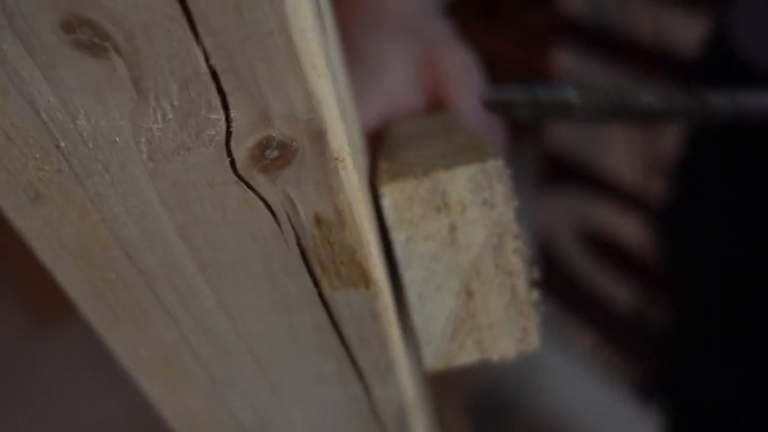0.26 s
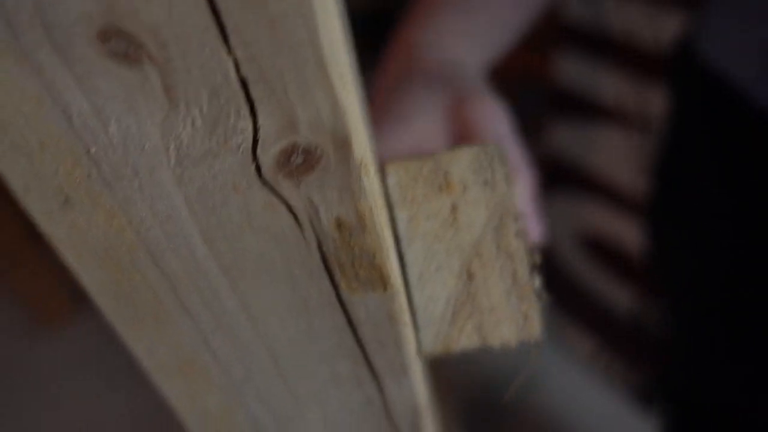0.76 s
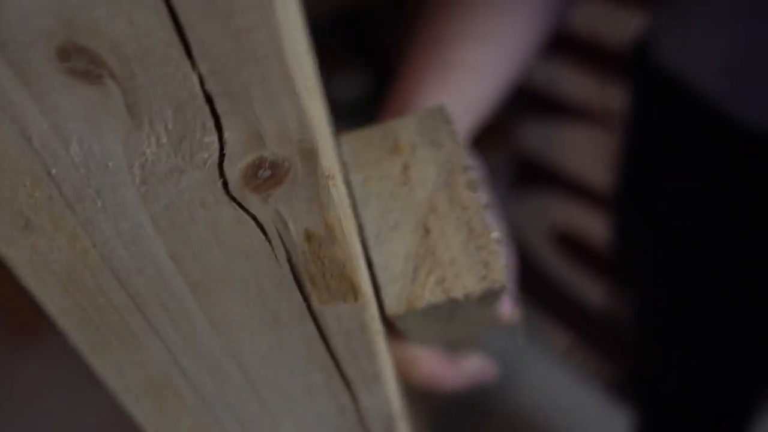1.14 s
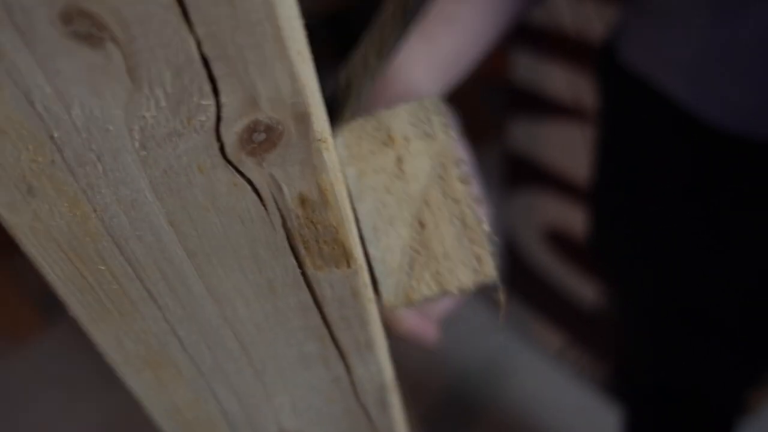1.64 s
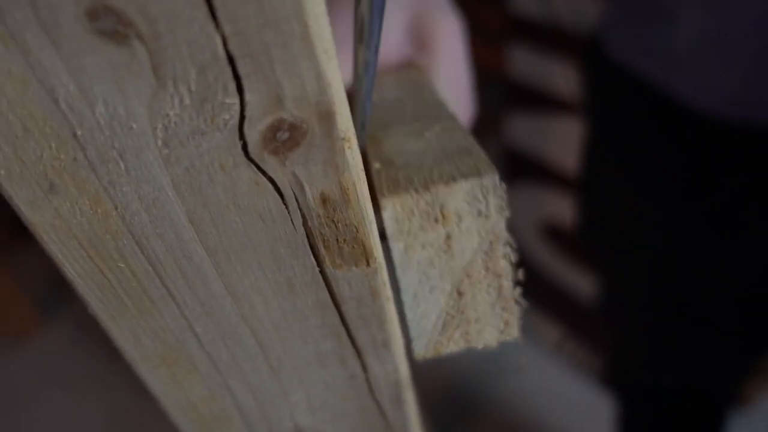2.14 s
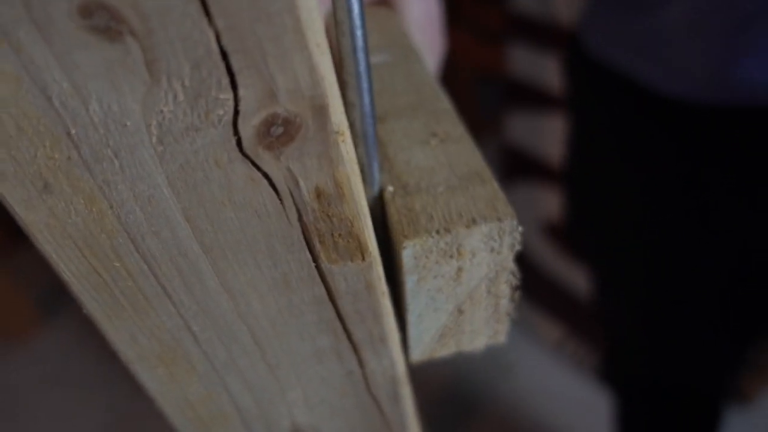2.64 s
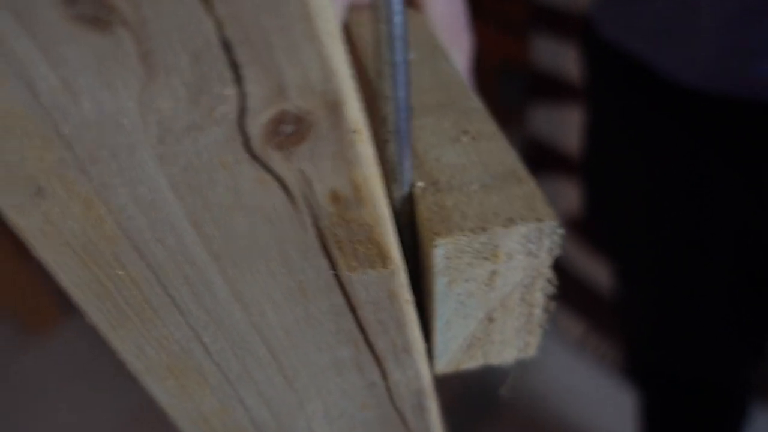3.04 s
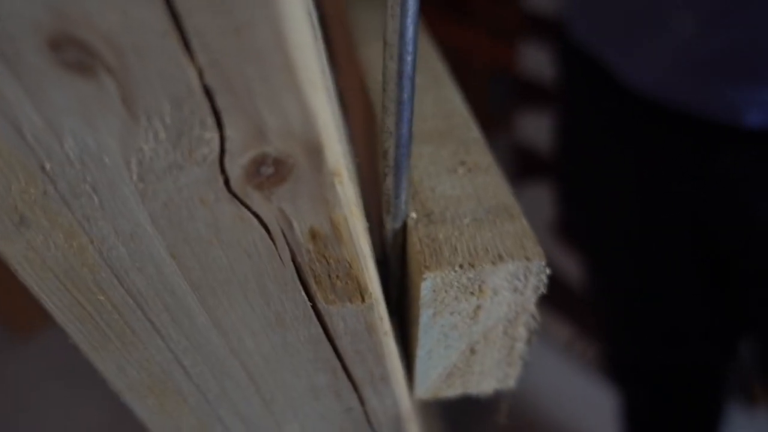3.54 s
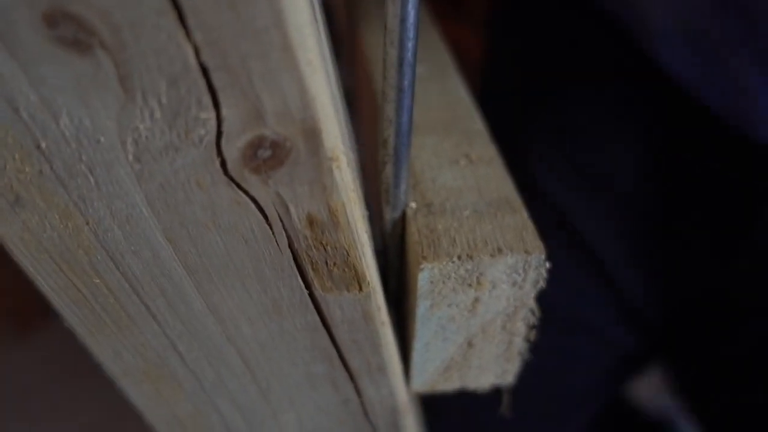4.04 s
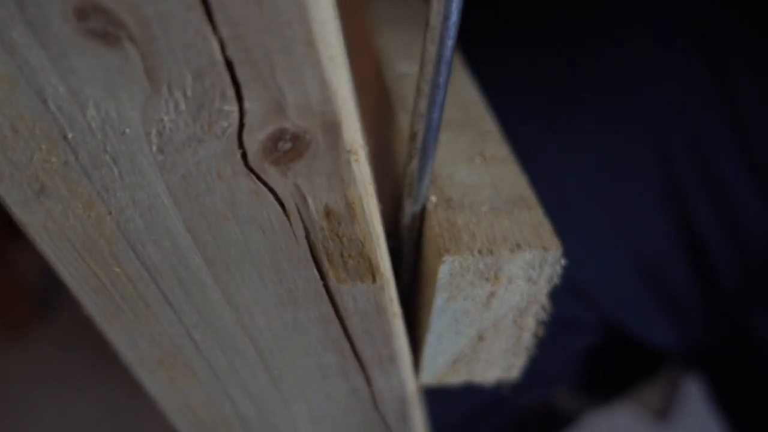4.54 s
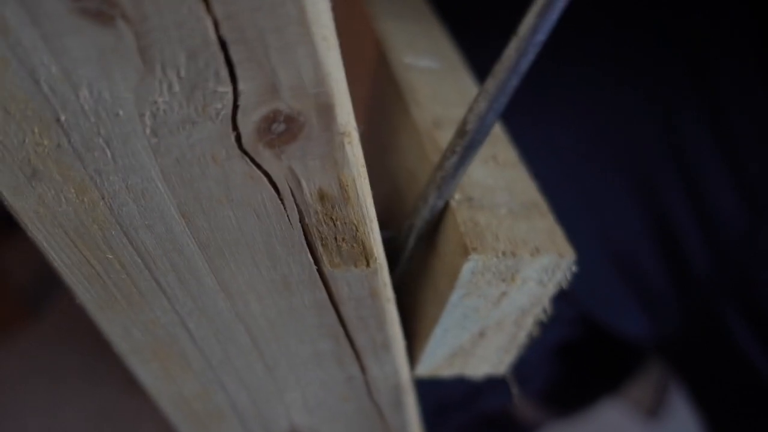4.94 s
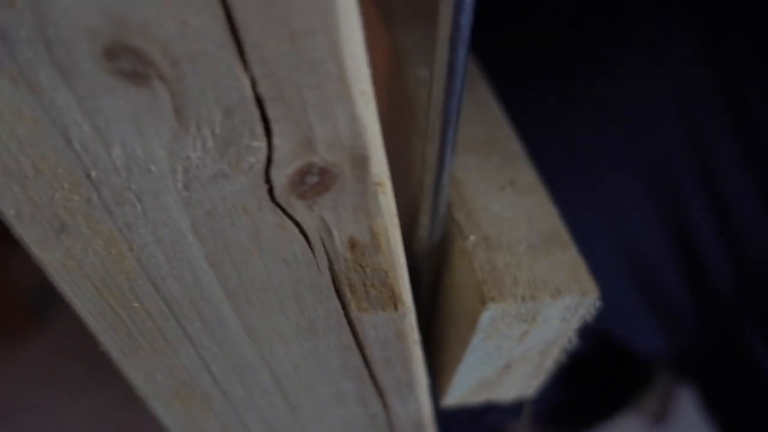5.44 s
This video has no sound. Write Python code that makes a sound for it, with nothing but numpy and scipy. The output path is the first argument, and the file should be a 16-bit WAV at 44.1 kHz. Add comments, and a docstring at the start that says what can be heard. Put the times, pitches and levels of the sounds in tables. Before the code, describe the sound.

After a loud, ringing knock on wood, a steel bar taps and rasps irregularly between nailed boards in a small workshop, growing sharper near the end.

```python
"""One hard knock on a board rings through a small workshop. Then a thin steel bar is slid, tapped and
levered between a nailed block and the board. Each impact excites the normal modes of steel and wood:
a click, a ring and a knock. Between impacts, the friction of steel and hands on wood rasps and makes
the bar sing, and a nail creaks by stick-slip. The walls reverberate over a faint hush, and a limiter
holds down the first blow."""
import sys
import numpy as np
from scipy import signal
from scipy.fft import rfft, irfft, next_fast_len
from scipy.io import wavfile
from scipy.ndimage import uniform_filter1d, minimum_filter1d, map_coordinates

SR = 44100
rng = np.random.default_rng(int(sys.argv[2]) if len(sys.argv) > 2 else 0)


def unload_audio(sound):
    """Save the sound as a 16-bit wav file, at the path given as the first command line argument."""
    columns = np.transpose(np.atleast_2d(sound))
    # keep every value between -1 and 1, then stretch to whole-number steps
    steps = np.round(np.clip(columns, -1, 1) * 32767)
    wavfile.write(sys.argv[1], SR, steps.astype(np.int16))


N = 251149

# Long-lived modes of the hard-struck board: (frequency [Hz], relative level [dB], T60 [s])
BLOW_MODES = [(688.6, -5.5, .38), (715, -2, .4), (890, -12, .3), (1141, -11, .3), (1497, -7, .28),
              (1932, -15, .33), (2017, -12.5, .35)]
# Spectrum of the blow's reverberation: (frequency [Hz], relative level [dB])
BLOW_SPECTRUM = [(90, -37.5), (704, -14.5), (1490, -11.5), (7410, -34.5), (10800, -38)]
# Impacts of steel on wood: (time [s], ring level [dB], thud [dB re ring], knock [dB re ring],
# favoured mode [Hz], its level [dB re ring], force rise time [s])
CONTACTS = [(0.456, -39, 2.5, 2, 1493, 0, 0.0047), (0.859, -29, -15, -4, 761, 3, 0.0042),
            (0.9422, -33.5, -9.5, -12, 785, 2.5, 0.0024), (1.1921, -47.5, -25, -4.5, 780, 1, 0.0027),
            (1.4722, -30.5, -14, -1.5, 906, -10, 0.0043), (1.501, -30.5, -23, -12, 894, 5, 0.0028),
            (1.507, -24.5, -12, -8.5, 3220, -10, 0.0042), (1.811, -29.5, -20, -12.5, 805, -4.5, 0.0012),
            (1.959, -42.5, -15, -24, 760, -3, 0.0019), (2.039, -53, 5, 5, 770, 15.5, 0.0038),
            (2.2636, -44.5, -8, -8, 1940, 3, 0.0021), (2.967, -42, -39, 0, 1180, -18, 0.00054),
            (3.1287, -50, -34, 6, 780, 7, 0.0025), (3.294, -42, 2.5, 6.5, 1562, 6, 0.004),
            (3.6, -46.5, 7, 3, 1200, 5, 0.0035), (3.655, -49, -1, 6.5, 2050, 10, 0.0023),
            (4.303, -35.5, -36, -24, 2890, -7, 0.018), (4.5097, -50.5, 5.5, 11.5, 552, 10, 0.0015),
            (4.544, -18.5, -31.5, -13, 2340, -33, 0.0052), (4.653, -32, -32, -5.5, 3240, 1, 0.0023),
            (4.6845, -14.5, -68, -59, 3160, 2, 0.0017), (4.71, -25.5, -46, -9.5, 3230, 3.5, 0.0024),
            (4.7527, -15.5, -54, -52, 3234, 5.5, 0.0018), (4.9999, -35, -52, -17, 2660, -20, 0.002),
            (5.0441, -57.5, 8.5, 15, 1004, 11.5, 0.0022), (5.0746, -24, -27.5, -42, 3204, 2, 0.0017),
            (5.227, -10.5, -45, -16, 2615, -22.5, 0.0026), (5.408, -32.5, -16, -19, 866, 2.5, 0.012),
            (5.422, -17, -18, -12.5, 2645, -24, 0.011), (5.6178, -20, -13.5, -5.5, 2592, -17, 0.0032),
            (5.665, -32, -11, -16, 2670, -19, 0.0028), (5.682, -31.5, -7, -20, 2600, -17, 0.0026)]
# The bar's high modes over time, how bright each tap's click sounds: (time [s], level [dB re ring])
CLICK_LEVELS = [(.8, -36.5), (1.85, -8), (2.6, 16), (3.3, -6), (3.66, 7), (4.3, 8.5), (4.55, -26),
                (4.66, 6.5), (5.1, 2.5), (5.4, -19), (5.68, 3)]
# Steel modes; the wood's grip damps some and frees others:
# (frequency [Hz], base bandwidth [Hz], gain when free [dB], gain when wedged [dB])
BAR_MODES = [(1530, 70, -4, -14), (2000, 100, -14, -6), (2620, 110, -13, -1), (3275, 75, 0, -11),
             (4470, 300, -17, -5), (5270, 200, -9.5, -18), (5750, 300, -24, -11), (7200, 170, -12, -15),
             (8700, 110, -16, -17)]
# Modes of the board: (frequency [Hz], bandwidth [Hz], gain [dB])
BOARD_MODES = [(582.6, 58, 2), (760.5, 99, 4.5), (883, 120, 2), (1112.7, 67.6, 9.5)]
# Low modes of the stack of block and board: (frequency [Hz], bandwidth [Hz], gain [dB])
STACK_MODES = [(238, 22, 9), (440, 90, 0)]
# Damping of the favoured mode, from hollow wood to thin steel: (frequency [Hz], bandwidth [Hz])
FAVOURED_WIDTHS = [(900, 44), (1500, 16), (2000, 50), (2450, 7), (2800, 6), (3000, 210)]
# Slow sliding of steel and palms: (time [s], rasp level [dB], rumble level [dB])
SLIDING = [(0, -53, -45.5), (.4, -68, -58.5), (.83, -64.5, -75), (1.1, -58.5, -66.5), (1.45, -65.5, -86),
           (1.6, -64, -71), (2.45, -52, -64.5), (2.73, -56.5, -58.5), (3.06, -52, -63), (3.58, -61, -70.5),
           (3.7, -53, -63), (4.15, -49, -58.5), (4.6, -43.5, -56.5), (4.97, -55.5, -64.5), (5.69, -52, -66)]
# Strokes of the bar on wood: (start [s], length [s], rasp level [dB], singing level [dB], wedged [0-1])
STROKES = [(0, 0.15, -75, -47, 0.6), (0.435, 0.068, -57, -54.5, 0.6), (0.963, 0.07, -59.5, -52.5, 0.2),
           (1.635, 0.12, -70.5, -48.5, 0), (2.09, 0.065, -66, -44.5, 0), (2.206, 0.079, -70, -51, 0),
           (2.362, 0.035, -47.5, -51, 0.3), (2.499, 0.21, -60.5, -51.5, 0.95), (2.739, 0.25, -46, -48, 1),
           (3.317, 0.1, -54, -80, 0.2), (3.79, 0.082, -62, -59, 1), (5.234, 0.046, -37.5, -42, 0.2),
           (5.626, 0.049, -40.5, -69, 0.5)]
# Spectrum of the friction noise: (frequency [Hz], relative level [dB])
RASP_SPECTRUM = [(410, -35), (700, -22.5), (2480, -15), (10500, -23)]
# Creak of the nail: (time [s], pitch [Hz], level [dB])
CREAK = [(4.56, 1198, -43), (4.65, 1290, -38.5), (4.69, 1393, -40.5), (4.78, 1515, -47.5), (4.9, 1500, -60)]
# Reverberation of the workshop: (frequency [Hz], base T60 [s])
ROOM_DECAY = [(100, 0.81), (400, 0.49), (3000, 0.32)]
# Coherence of the diffuse field: (frequency [Hz], left-right correlation [0-1])
COHERENCE = [(300, 0.99), (1200, 0.69), (10000, 0.062)]
# Spectrum of still air and hiss: (frequency [Hz], relative level [dB])
HUSH_SPECTRUM = [(59, -62), (120, -39), (310, -11), (2650, -5.5), (9620, -24.5)]


def blow(start_s=0.074, level_db=-1.5, attack_s=0.00089):
    """Free vibration: the struck board's modes decay, two close ones beating, as the room reverberates."""
    out, t = np.zeros((2, N)), np.arange(SR // 2) / SR
    ring = sum(amp(db - 60 * t / t60 + 1.2 * wobble(30)[:len(t)]) * np.sin(2 * np.pi * hz * t)
               for hz, db, t60 in BLOW_MODES)
    ring *= 1 - np.exp(-t / attack_s)
    reverb = unit(coloured(room_response(decay_scale=0.81), BLOW_SPECTRUM))
    add(out, start_s, amp(level_db) * (ring + amp(-15.5) * reverb))
    return out


def contacts():
    """Impact excitation: a brief force drives stack, board and bar; the spot struck favours one mode."""
    out, t = np.zeros((2, N)), np.arange(SR // 8) / SR
    padded = lambda x: np.pad(x, (0, SR // 4))
    for s, db, thud_db, knock_db, spot_hz, spot_db, rise_s in CONTACTS:
        force = rng.standard_normal(len(t)) * (t / rise_s * np.exp(1 - t / rise_s)) ** 2
        force /= np.linalg.norm(force)
        snap = 0.46 * force
        snap[round(rise_s * SR / 2)] += 0.0017 / rise_s  # shorter contacts strike the modes more cleanly
        impulse = snap == snap.max()  # the heavy stack feels one plain push
        wedged = np.exp(-(np.log(spot_hz / 2600) / .13) ** 2)  # a wedged bar answers near 2.6 kHz
        steel = bar_modes(wedged, damping=2.1)
        click_db = np.interp(s, *np.transpose(CLICK_LEVELS))
        thud = amp(db + thud_db) * padded(struck_body(STACK_MODES, impulse, force, crack=.02))
        knock = amp(db + knock_db) * padded(struck_body(BOARD_MODES, snap, force, crack=.08))
        ring = amp(db) * padded(struck_body(steel[:4], snap, force, crack=.1))
        click = amp(db + click_db) * padded(struck_body(steel[4:], snap, force, crack=.16))
        favoured = filtered(padded(snap), modes([(spot_hz, along(FAVOURED_WIDTHS, spot_hz), 0)]))
        favoured *= amp(db + spot_db) / np.abs(favoured).max()
        radiate(out, s, thud + knock, ring + click, favoured)
    return out


def struck_body(body, drive, force, crack):
    """Modal response, peak 1: the drive rings the modes and the force adds a broadband crack."""
    hz = np.transpose(body)[0]
    band = modes([(np.sqrt(hz[0] * hz[-1]), np.ptp(hz) * 2.94, 0)])
    sound = filtered(drive, modes(body, extra_db=rng.normal(0, 3.0, len(body))))
    sound += crack * filtered(force, lambda f: band(f) ** 2)
    sound = filtered(sound, lambda f: high_pass(f, .6 * hz[0]))  # little radiates below the lowest mode
    return sound / np.abs(sound).max()


def bar_modes(wedged, damping):
    """Boundary conditions: the grip, free (0) to wedged (1), weights the modes; damping widens them."""
    return [(hz, width * damping, free_db + wedged * (wedged_db - free_db))
            for hz, width, free_db, wedged_db in BAR_MODES]


def rubbing():
    """Sliding friction: grit under steel and palms rasps and drives the wood's modes into a rumble."""
    rasp_db, rumble_db = curves(SLIDING)
    strokes = sum(amp(db) * stroke(s, length) for s, length, db, *_ in STROKES)
    rasp = unit(diffuse(coloured(patchy(grit(rough_db=1.8), depth_db=2.8), RASP_SPECTRUM)))
    wood_modes = STACK_MODES + BOARD_MODES
    wood = modes(wood_modes, extra_db=-1.5 * np.arange(len(wood_modes)))
    rumble = filtered(grit(rough_db=0.94), lambda hz: wood(hz) * hz ** 4 / (hz ** 4 + 294.0 ** 4))
    rumble = unit(diffuse(rumble))
    return (amp(rasp_db) + strokes) * rasp + (amp(rumble_db) + amp(-15) * strokes) * rumble


def singing(smoothing_s=0.043, catch_db=2.2):
    """Forced vibration: friction sustains the bar's modes, which swell and drop as the steel catches."""
    def tone(wedged):
        friction = patchy(grit(rough_db=2.5), depth_db=1 + 2 * wedged)
        steel = modes(bar_modes(wedged, damping=.45 + .5 * wedged))
        return unit(diffuse(filtered(friction, steel)))

    free, held, out = tone(0), tone(1), 0
    for s, length, _, db, wedged in STROKES:
        swell = uniform_filter1d(stroke(s, length), size=round(smoothing_s * SR))
        blend = np.sqrt(1 - wedged) * free + np.sqrt(wedged) * held
        out = out + amp(db + catch_db * wobble(40)) * swell * blend
    return out


def stroke(s, length, grip_s=0.0073, release_s=0.02):
    """Friction envelope: a quick linear rise, a hold and an exponential decay."""
    t = np.arange(N) / SR - s
    return np.clip(t / grip_s, 0, 1) * np.exp(-np.maximum(t - length, 0) / release_s)


def grit(rough_db):
    """Surface roughness: fast amplitude modulation breaks two noises into fine grains."""
    unevenness = amp(1.3 * wobble(35))
    return rng.standard_normal((2, N)) * amp(rough_db * wobble(700)) * unevenness


def patchy(pair, depth_db):
    """Friction resonances come, go and shift: random gain patches over time and frequency."""
    spectra = signal.stft(pair, nperseg=512)[2]
    patches = uniform_filter1d(rng.standard_normal(spectra.shape[1:]), size=4, axis=0)
    patches = uniform_filter1d(patches, size=16, axis=1)
    return signal.istft(spectra * amp(depth_db * unit(patches)), nperseg=512)[1][:, :N]


def creak():
    """Stick-slip: the nail moves unevenly in its hole, giving a rough tone that rises with the pull."""
    hz, db = curves(CREAK)
    start, end = CREAK[0][0], CREAK[-1][0]
    gate = np.interp(np.arange(N) / SR, [start - .01, start, end, end + .014], [0, 1, 1, 0])
    jitter, slips = 1 + .06 * wobble(400), amp(5 * wobble(250))
    phase = 2 * np.pi * np.cumsum(hz * jitter) / SR
    tone = np.sin(phase) + amp(-12) * np.sin(2 * phase)
    return gate * amp(db) * unit(tone * slips) * np.ones((2, 1))


def radiate(out, s, wood, steel, favoured):
    """Direct and reverberant fields of an impact, added to out; wood excites the room most strongly."""
    direct = wood + steel + favoured
    side = filtered(direct, lambda f: 0.94 * f / (f + 6000) * np.exp(1j * f / 900))
    add(out, s, np.array([direct + side, direct - side]))  # the treble differs left and right
    to_walls = wood + amp(-6) * steel + amp(-16) * favoured
    to_walls = filtered(to_walls, lambda f: 1 / (1 + 1j * f / 5000))  # the treble beams forward
    reverb = signal.fftconvolve(to_walls[None], room_response(decay_scale=0.8), axes=1)
    add(out, s + .005, amp(2.0) * reverb)


def room_response(decay_scale):
    """Reverberation: a fresh stereo noise tail of unit energy, absorbed faster at high frequencies."""
    hz, t, spectra = signal.stft(rng.standard_normal((2, SR // 2)), SR, nperseg=256)
    t60 = decay_scale * along(ROOM_DECAY, hz)[:, None]
    tail = signal.istft(spectra * amp(-60 * t / t60), SR, nperseg=256)[1]
    tail = diffuse(tail[:, :SR // 2])
    return tail / np.linalg.norm(tail[0])


def diffuse(pair):
    """Diffuse-field coherence: two independent signals mix to left and right, alike in the bass."""
    angle = lambda hz: np.arccos(np.clip(along(COHERENCE, hz), -1, 1)) / 2
    mid, side = filtered(pair, lambda hz: np.array([np.cos(angle(hz)), np.sin(angle(hz))]))
    return np.array([mid + side, mid - side])


def hush(level_db=-69):
    """Noise floor: the steady, diffuse hiss of the still room."""
    return amp(level_db) * unit(diffuse(coloured(rng.standard_normal((2, N)), HUSH_SPECTRUM)))


def modes(table, extra_db=0):
    """Modal superposition: the summed response of resonances, neighbours in opposite phase."""
    hz, width, db = np.transpose(table)[:, :, None]
    sign = (-1.) ** np.arange(len(table))[:, None]
    gain = sign * amp(db + np.reshape(extra_db, (-1, 1)))
    return lambda f: np.sum(gain * 1j * f * width / (hz * hz - f * f + 1j * f * width), axis=0)


def filtered(x, response):
    """Linear filtering: the spectrum of x times a complex frequency response."""
    n = x.shape[-1]
    size = next_fast_len(n + SR // 10)
    return irfft(rfft(x, size) * response(np.fft.rfftfreq(size, 1 / SR)), size)[..., :n]


def coloured(x, spectrum):
    """Spectral shaping by (frequency [Hz], level [dB]) points."""
    return filtered(x, lambda hz: amp(along(spectrum, hz)))


def high_pass(hz, corner_hz):
    """Second-order high-pass response."""
    return (1j * hz / (corner_hz + 1j * hz)) ** 2


def amp(db):
    """Decibels to amplitude ratio."""
    return 10 ** (np.asarray(db) / 20)


def unit(x):
    """Normalisation to rms 1."""
    return x / np.sqrt(np.mean(x ** 2) + 1e-20)


def along(points, hz):
    """Interpolation of (frequency [Hz], value) points on a log axis."""
    knots_hz, values = np.transpose(points)
    return np.interp(np.log(hz + 1), np.log(knots_hz + 1), values)


def curves(rows):
    """Interpolation to one value per sample for each column after the time."""
    times, *columns = np.transpose(rows)
    return [np.interp(np.arange(N) / SR, times, column) for column in columns]


def wobble(rate):
    """Smooth random modulation with rate knots a second."""
    return map_coordinates(rng.standard_normal(int(N * rate / SR) + 4), [np.arange(N) * rate / SR])


def add(out, s, sound):
    """Mixes a stereo sound in at s seconds."""
    part = out[:, round(s * SR):][:, :sound.shape[1]]
    part += sound[:, :part.shape[1]]


def scene():
    """Superposition: the pressures of all sources add."""
    return blow() + contacts() + rubbing() + singing() + creak() + hush()


def record(dry, ceiling=0.58, bass_hz=55, top_hz=11000):
    """Peak limiting holds down the loudest blow; band limiting cuts deep bass and high treble."""
    needed_gain = np.minimum(1, ceiling / (np.abs(dry).max(axis=0) + 1e-9))
    gain = uniform_filter1d(minimum_filter1d(needed_gain, size=881), size=441)
    treble_cut = lambda hz: amp(-np.clip((hz - top_hz) / 17, 0, 90))
    return filtered(dry * gain, lambda hz: high_pass(hz, bass_hz) * treble_cut(hz))


dry = scene()
out = record(dry)
unload_audio(out)
```